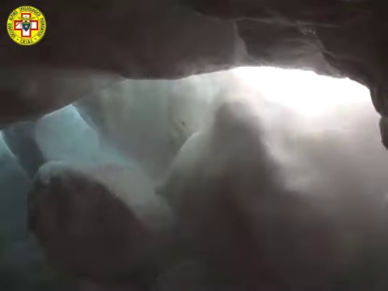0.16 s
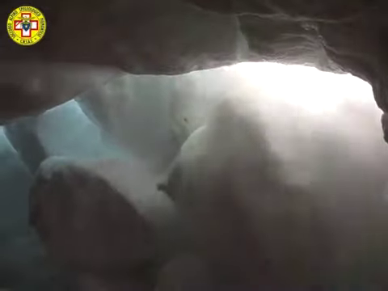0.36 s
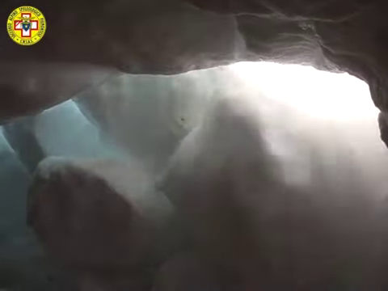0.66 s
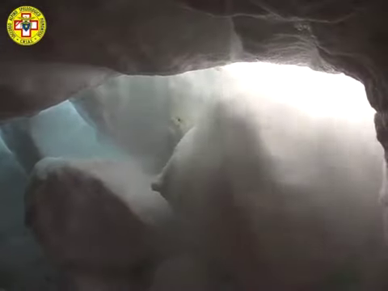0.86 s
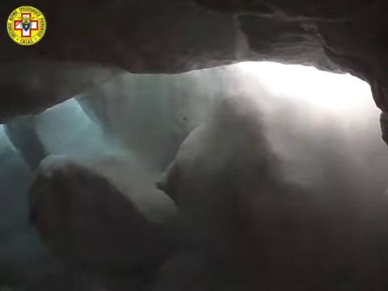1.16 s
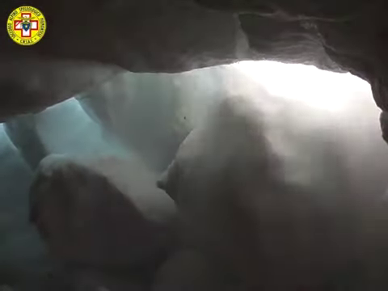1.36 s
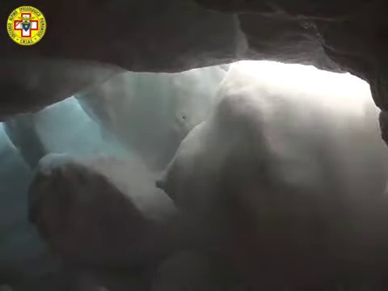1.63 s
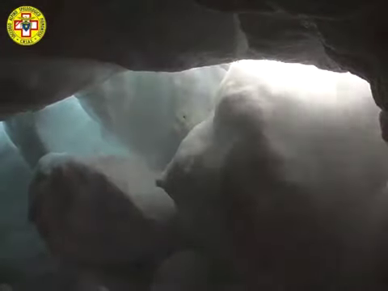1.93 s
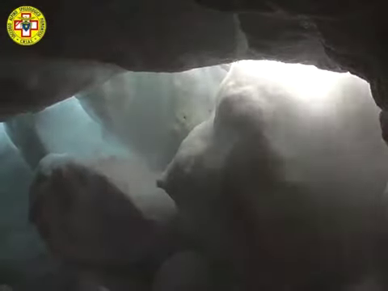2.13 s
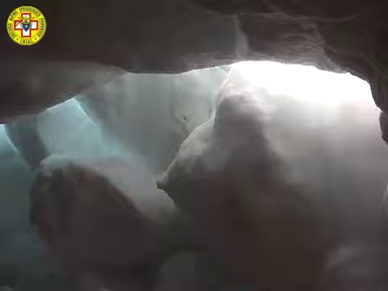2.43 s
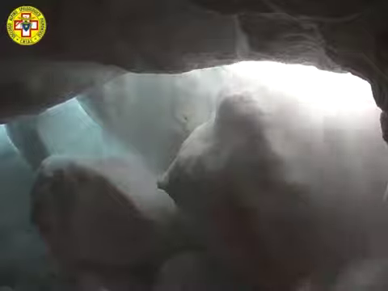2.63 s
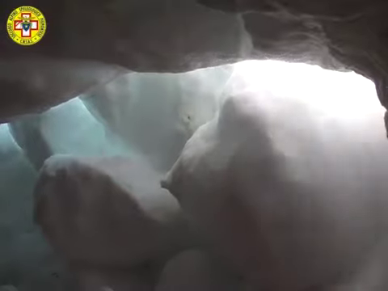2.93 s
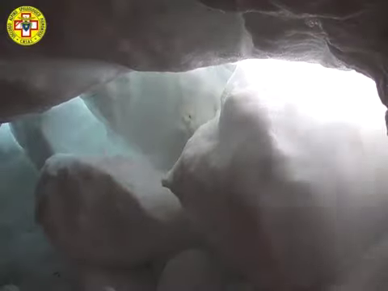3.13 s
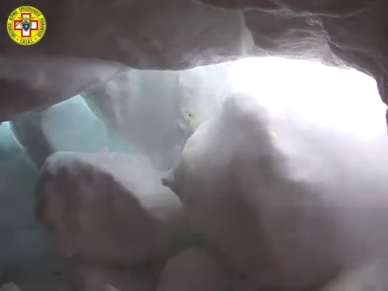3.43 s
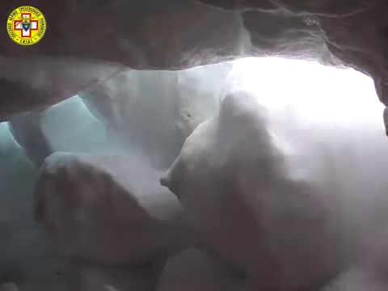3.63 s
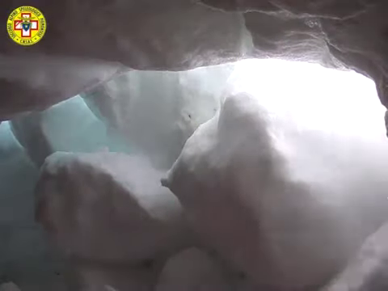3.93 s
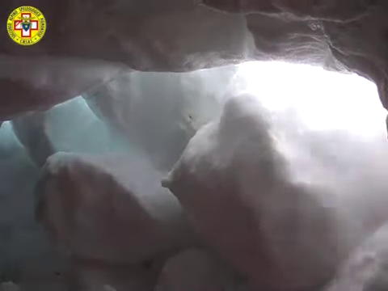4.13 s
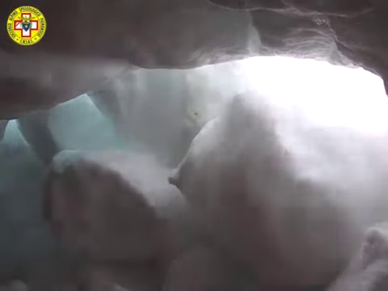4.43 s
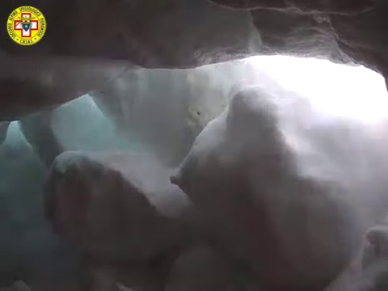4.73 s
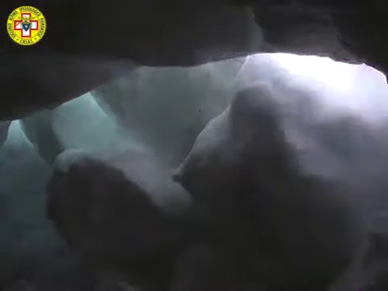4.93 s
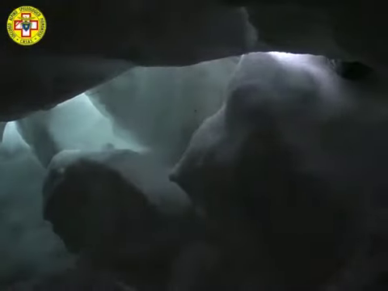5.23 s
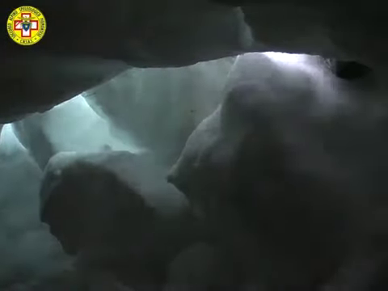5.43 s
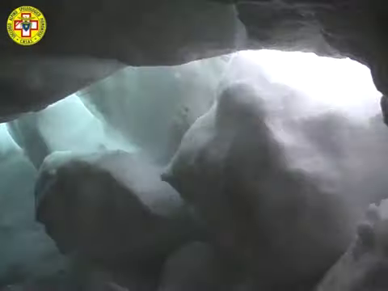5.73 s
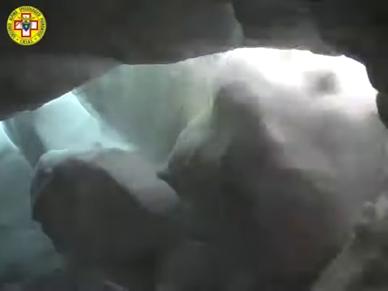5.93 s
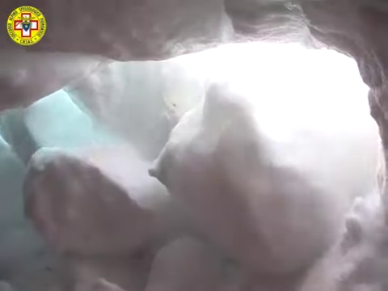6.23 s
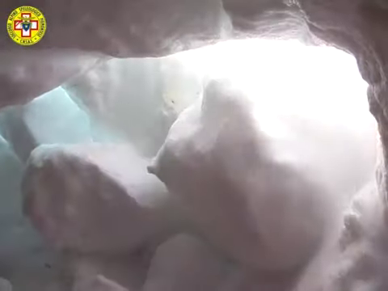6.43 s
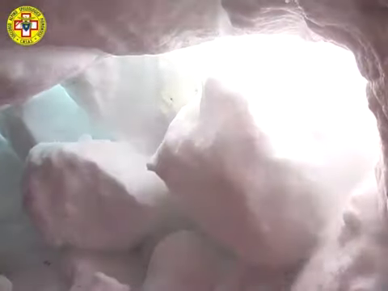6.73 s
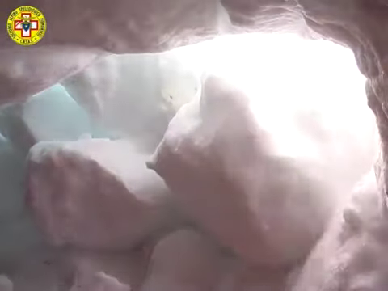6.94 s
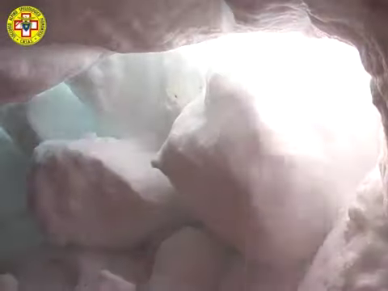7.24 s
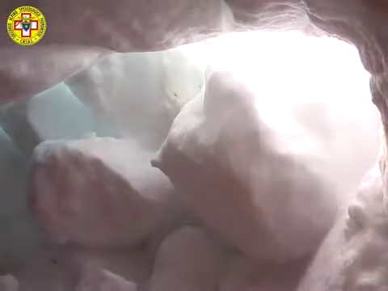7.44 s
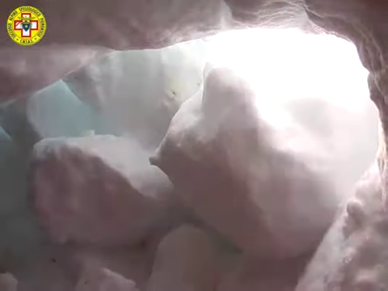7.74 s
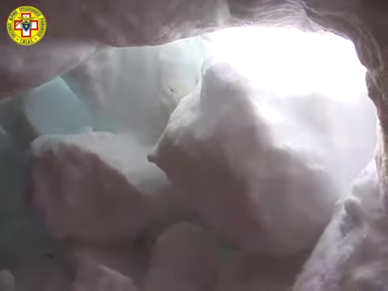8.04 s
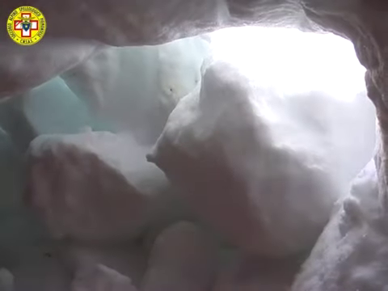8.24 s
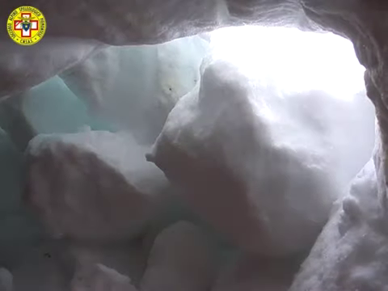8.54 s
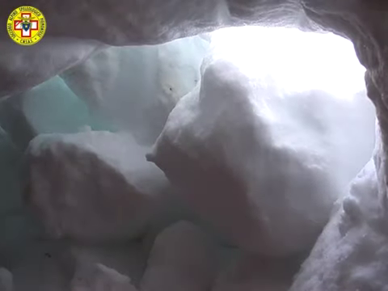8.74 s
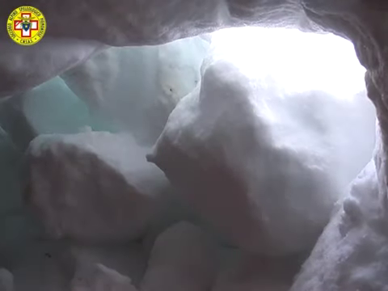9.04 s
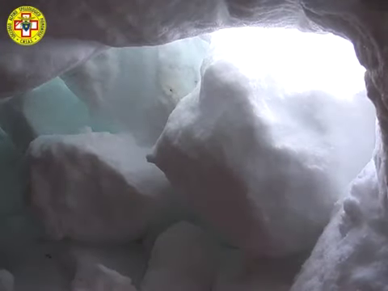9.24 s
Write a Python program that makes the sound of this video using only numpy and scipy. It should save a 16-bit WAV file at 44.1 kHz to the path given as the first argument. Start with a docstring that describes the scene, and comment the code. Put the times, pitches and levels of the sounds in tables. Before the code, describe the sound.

Heard close up inside a small snow hollow: a dog digs fast, paws rasping through crisp icy snow four or five times a second, thudding low on the roof while crumbs tick. After about three seconds six short, hoarse yelps come, each climbing from a grunt to a whine. The digging thins and fades until little but a faint quiet bed remains.

```python
"""A dog digs into a snow hole, heard from inside it.
At first its paws rasp through icy snow four or five times a second and thump the hollow; crumbs tick.
From about three seconds it gives six yelping barks, each climbing from a grunt to a whine that sags;
a few grainy bursts trail the barks. The digging grows fainter and dies away. Snow is filtered bursts
of noise, thumps are ringing modes, and the voice is a stack of gliding harmonics with hoarse breath."""
import sys
import numpy as np
from scipy import signal
from scipy.fft import rfft, irfft, next_fast_len
from scipy.io import wavfile
from scipy.ndimage import uniform_filter1d

SR = 44100
rng = np.random.default_rng(int(sys.argv[2]) if len(sys.argv) > 2 else 0)


def persist_wave(psi):
    """Save psi, clipped to +-1, as 16-bit WAV."""
    counts = np.round(np.clip(psi, -1, 1) * 32767).astype(np.int16)
    wavfile.write(sys.argv[1], SR, np.atleast_2d(counts).T)


N = 413216
TIME = np.arange(N) / SR

# All levels in the tables are relative: trims, filters and the room come after them.
# faint bed of the hollow: hz, level_db
QUIET_SPECTRUM = [(20, -7), (200, -5.5), (400, -5.5), (1000, -4.5), (4000, -17.5), (10000, -27.5),
                  (15500, -22)]
# likeness of left and right: hz, likeness (0-1)
STEREO_LIKENESS = [(60, 1), (250, 0.9), (700, 0.74), (1400, 0.31), (4000, 0.78), (7000, 1), (10000, 0.58),
                   (15000, 0.2)]
# weight shifting on the roof: time_s, level_db
WEIGHT = [(0, -61), (0.8, -55.5), (2.5, -58.5), (3.1, -51), (4.4, -53.5), (4.9, -65), (5.55, -58.5),
          (5.95, -53), (6.55, -49.5), (7.05, -59.5), (7.4, -70), (7.8, -85), (7.95, -61), (8.6, -64),
          (9.1, -77)]
# low rumble of the roof: hz, level_db
RUMBLE_SPECTRUM = [(20, -31.5), (55, -12), (115, 0.5), (160, -2.5), (220, -2), (320, -13.5), (550, -19),
                   (1200, -34.5), (4000, -66)]
# paws landing on the roof: start_s, level_db
THUMPS = [(0.002, -32.5), (0.182, -30), (0.216, -25.5), (0.376, -29.5), (0.526, -36.5), (0.569, -28.5),
          (1.046, -30.5), (1.264, -33), (1.844, -38.5), (2.414, -41.5), (2.66, -31.5), (2.812, -40),
          (2.869, -31), (3.048, -37), (3.214, -28.5), (3.674, -29.5), (3.884, -33.5), (4.314, -38),
          (4.686, -37.5), (5.838, -34.5), (6.571, -31.5), (6.612, -34.5), (7.907, -50), (8.033, -49.5),
          (8.307, -51), (8.507, -49.5)]
# modes of the roof and the air under it: hz, level_db, t60_s
ROOF_MODES = [(57, -26.5, .12), (122, 1.5, 0.12), (177, 4.5, 0.07), (203.6, -2, 0.07), (280.4, -15, 0.015)]
# crust snapping and crumbs landing: start_s, level_db
SNAPS = [(0.206, -30.5), (0.909, -37), (1.954, -33), (1.964, -45), (2.927, -34.5), (3.24, -35),
         (3.292, -34), (3.4527, -41), (3.505, -45.5), (3.562, -45.5), (3.67, -41.5), (4.294, -38.5),
         (4.854, -55), (4.946, -49.5), (5.106, -56), (6.3217, -33), (6.962, -49.5), (7.3093, -58.5),
         (7.37, -49), (7.4507, -56), (7.879, -61), (7.91, -57), (8.036, -66), (8.12, -73)]
# loose snow trickling under the bursts: time_s, level_db
TRICKLE = [(0, -53), (.8, -52), (1.4, -49), (2.8, -52.5), (3.6, -59.5), (4.4, -57.5), (4.78, -71.5),
           (5.0, -68), (5.62, -69.5), (5.98, -56), (6.55, -55), (6.66, -65), (7.25, -72), (7.38, -68),
           (7.7, -79), (7.92, -75.5), (8.25, -83.5), (9.35, -87)]
# grainy bursts: paw strokes, but the rows at 4.64, 4.708 and 6.515 are the noisy tails of barks;
# end_s (where a stroke lifts), length_s, rasp_db (bright part), crunch_db (dull part)
BURSTS = [(.188, 0.12, -41.5, -46.5), (.36, .12, -41, -46.5), (.588, .12, -37, -45.5),
          (.812, 0.17, -40, -52), (1.022, 0.17, -38.5, -53), (1.268, 0.18, -37.5, -45),
          (1.5, 0.19, -42, -51.5), (1.705, 0.16, -43, -58), (1.87, 0.092, -43, -50),
          (1.925, 0.028, -43, -63), (2.17, 0.17, -42, -53.5), (2.295, .075, -39.5, -46),
          (2.388, 0.081, -39.5, -50), (2.495, 0.068, -42.5, -57), (2.662, .13, -40, -46.5),
          (2.865, 0.15, -38.5, -43.5), (3.11, 0.14, -43.5, -52), (3.218, 0.057, -37, -44),
          (3.36, 0.062, -42, -40.5), (3.838, 0.093, -46.5, -51), (4.03, 0.18, -56, -57),
          (4.255, 0.13, -56.5, -55.5), (4.469, .12, -53, -59), (4.64, .06, -55.5, -47.5),
          (4.708, .025, -57, -43), (5.89, 0.038, -64.5, -47.5), (6.15, .1, -52.5, -51.5),
          (6.275, 0.095, -54, -51), (6.515, 0.037, -49, -38.5), (6.785, 0.091, -49.5, -55.5),
          (7.07, 0.083, -61.5, -57), (8.15, .2, -79, -71)]
# bright scrape of the crust: hz, level_db
RASP_SPECTRUM = [(500, -28), (1500, -9), (3000, -5.5), (4700, -3.5), (6500, -2.5), (9300, 2), (11000, -1.5),
                 (13000, -5.5), (15500, -14.5)]
# duller crush of packed snow: hz, level_db
CRUNCH_SPECTRUM = [(150, -5), (350, -4.5), (580, -3), (760, 8), (1050, -4), (1300, -2), (2450, -2.5),
                   (2900, -8), (15000, -45.5)]
# resonances of the hole: hz, width_hz, gain_db
HOLE_PEAKS = [(755, 250, -1.5), (1044, 120, 9), (1560, 470, 3.5), (4060, 300, 4), (6360, 130, 3.5),
              (7680, 210, 2)]
# colour with the dog at the opening: hz, width_hz, gain_db
NEAR_PEAKS = [(3110, 360, 8.7)]
# colour with the dog stepped back: hz, width_hz, gain_db
BACK_PEAKS = [(3400, 1500, 0), (5000, 460, -2.5), (5630, 360, 5.5)]
# pitches that cancel in the hole, so a gliding voice dips as it passes: hz, width_hz, gain_db
VOICE_NOTCHES = [(303, 72, -9.5), (609, 40, -13)]
# barks: start_s (the push), length_s, attack_s, glide_s, top_hz, sag (share of pitch), grunt_db, push_db,
# whine_db, push_rough (0-1), whine_rough (0-1), chest_db, bright_db (open mouth), falsetto (0-1)
BARKS = [(3.293, 0.12, 0.06, .04, 370, 0.63, -34, -25, -29, .62, 0.74, 0, -6, 0),
         (3.912, .132, 0.054, .036, 600.7, 0.39, -34.5, -18.5, -23.5, .75, 0.25, -7, -3.5, 0.94),
         (4.541, 0.14, 0.034, .034, 723.4, 0.028, -30.5, -20, -26.5, .75, 0.29, -5, 1, 0),
         (5.699, 0.12, .008, 0.032, 693.7, 0.18, -19.5, -16, -25.5, .55, 0.29, -1, -2, 0.13),
         (6.361, 0.1, 0.033, .028, 411.4, 0.048, -31.5, -23.5, -26, .35, 0.6, -3, 0.5, 0.73),
         (7.105, 0.11, 0.04, .037, 716.5, .2, -33.5, -20.5, -24, .1, .15, 1, -2, 0.16)]
# the dog's throat and mouth: hz, level_db
THROAT_SPECTRUM = [(60, -18), (130, -10.5), (240, 3), (330, -3.5), (500, 1), (720, 8), (900, -5.5),
                   (1200, 2.5), (1550, -10.5), (1950, -5.5), (2400, -5.5), (2850, -42), (9000, -35),
                   (15500, -51.5)]
# thin whistles through the nose: start_s, pitch_hz, level_db
WHISTLES = [(4.855, 13400, -58), (7.125, 13500, -52.5)]

EDGE_HZ = 15750  # top of the whole sound
STEP_BACK_S = 3  # the dog works at the opening until then
# a burst bites in, swells and lets go
BITE_S, SWELL_DB, LET_GO_S = 0.017, 7.5, 0.014
# every bark opens with a low grunt and ends with a sag in pitch and a quick release
GRUNT_S, GRUNT_START_HZ, GRUNT_HZ, GRUNT_START_DB = 0.025, 100, 129.4, -39
SAG_S, RELEASE_S, RELEASE_DB = 0.028, 0.018, 21.5
HOARSE_S = 0.03  # pace at which roughness comes and goes around the push
FALSETTO_S = 0.049  # the voice can crack this long before its end


def amp(db):
    """Decibels to gain."""
    return 10 ** (np.asarray(db) / 20)


def evened(x):
    """Scales to rms 1."""
    return x / np.sqrt(np.mean(x ** 2) + 1e-20)


def read_spectrum(points, hz):
    """Reads a spectrum table at any frequencies, along a log frequency axis."""
    f, value = np.transpose(points)
    return np.interp(np.log(hz + 1), np.log(f + 1), value)


def follow(points, t):
    """Reads a two-column curve at times t."""
    s, value = np.transpose(points)
    return np.interp(t, s, value)


def add(mix, s, sound):
    """Mixes a sound in at time s."""
    part = mix[max(round(s * SR), 0):][:len(sound)]
    part += sound[:len(part)]


def colour(x, points, peaks=()):
    """Filters by a spectrum table with resonance peaks or notches on top."""
    size = next_fast_len(x.shape[-1] + 2048)  # room for the filter to ring
    hz = np.fft.rfftfreq(size, 1 / SR)
    db = read_spectrum(points, hz)
    for f, width, height in peaks:
        db = db + height / (1 + (2 * (hz - f) / width) ** 2)
    return irfft(rfft(x, size) * amp(db), size)[..., :x.shape[-1]]


def wander(size, hz):
    """Smooth chance of rms 1, with a soft speed limit around hz."""
    full = next_fast_len(size)
    f = np.fft.rfftfreq(full, 1 / SR)
    slow = rfft(rng.standard_normal(full)) * np.exp(-(f / hz) ** 2)
    return evened(irfft(slow, full)[:size])


def spread(pair):
    """Turns two unrelated sounds into left and right, their likeness set per frequency."""
    size = next_fast_len(N)
    same = np.clip(read_spectrum(STEREO_LIKENESS, np.fft.rfftfreq(size, 1 / SR)), 0, 1)
    mid, side = rfft(pair, size) * np.sqrt([(1 + same) / 2, (1 - same) / 2])
    return irfft([mid + side, mid - side], size)[:, :N]


def wide_noise():
    """White noise spread over left and right."""
    return spread(rng.standard_normal((2, N)))


def quiet():
    """The steady faint bed under everything: shaped noise."""
    return amp(-75) * evened(colour(wide_noise(), QUIET_SPECTRUM))


def echoes(x, delay_s, t60):
    """Scattered reflections that start after a delay and die away, different in each ear."""
    t = np.arange(SR // 2) / SR
    fade = (t > delay_s) * amp(-60 * np.maximum(t - delay_s, 0) / t60)
    taps = rng.standard_normal((2, len(t))) * fade
    taps /= np.linalg.norm(taps, axis=1, keepdims=True)
    return signal.fftconvolve(x[None], taps, axes=1)[:, :N]


def slope_echo(voice):
    """The slope outside throws the barks back faintly, thinned in the bass."""
    thinned = colour(voice, [(200, -16.5), (700, -15.5), (1100, -1), (2400, -1.5)])
    return amp(-15.5) * spread(echoes(thinned, delay_s=0.05, t60=0.062))


def soft_walls(near):
    """The soft walls of the hole answer almost at once."""
    return amp(-14) * echoes(near, delay_s=0.0012, t60=0.17)


def close_wall(x, cancel_hz=1520, width_hz=330, depth=0.46, lean_db=0.65):
    """A close wall thins one band on the left only; the whole leans slightly left."""
    band = signal.lfilter(*signal.iirpeak(cancel_hz, cancel_hz / width_hz, SR), x)
    return np.array([amp(lean_db) * (x - depth * band), amp(-lean_db) * x])


def rumble(level_db=-2, lumps_db=3):
    """The snow roof gives in small lurches under the dog's weight: low noise of uneven level."""
    noise = evened(colour(wide_noise(), RUMBLE_SPECTRUM))
    return noise * amp(follow(WEIGHT, TIME) + level_db + lumps_db * wander(N, hz=25))


def snaps(decay_s=0.0079, spray_s=0.014, spray_db=-17, level_db=-4):
    """Each snap is a sharp crack of noise with a fainter, longer spray of crumbs."""
    t = np.arange(SR // 8) / SR
    burst = np.exp(-t / decay_s) + amp(spray_db) * np.exp(-t / spray_s)
    envelope = np.zeros(N)
    for s, db in SNAPS:
        add(envelope, s, amp(db) * burst)
    return amp(level_db) * envelope * evened(colour(wide_noise(), RASP_SPECTRUM, HOLE_PEAKS))


def roof_ring(t):
    """The low modes of the roof, each detuned slightly by chance and dying at its own rate."""
    ring = np.zeros(len(t))
    for hz, mode_db, t60 in ROOF_MODES:
        detuned_hz = hz * (1 + rng.normal() / 50)
        ring += amp(mode_db - 60 * t / t60) * np.cos(2 * np.pi * detuned_hz * t)
    return ring


def thumps(push_s=0.006, crush_s=0.009, crush_db=-15, level_db=-1):
    """A paw gives the roof an uneven push that rings its low modes and crushes a little snow."""
    t, out = np.arange(SR // 4) / SR, np.zeros(N)
    for s, db in THUMPS:
        push = t * np.exp(-t / push_s) * (0.5 + wander(len(t), hz=418.5))
        thud = signal.fftconvolve(push, roof_ring(t))[:len(t)]
        crush = evened(colour(rng.standard_normal(len(t)), CRUNCH_SPECTRUM)) * np.exp(-t / crush_s)
        add(out, s, amp(db + level_db) * (thud / abs(thud).max() + amp(crush_db) * crush))
    return out


def grains(per_s, scatter_db, ring_s):
    """Ice grains breaking: tiny bursts of noise, a few larger than the rest."""
    breaks = rng.random(N) < per_s / SR
    sizes = amp(scatter_db * np.minimum(rng.exponential(1, N), 5)) * breaks
    # dividing by the rate keeps the level steady while the density changes
    power = signal.lfilter([1], [1, -np.exp(-1 / (ring_s * SR))], sizes ** 2 / per_s)
    return evened(np.sqrt(power) * rng.standard_normal((2, N)))


def patchy(x, depth_db):
    """Lets the colour shift by chance, as it does when grains break in ever new places."""
    z = signal.stft(x, nperseg=256, noverlap=192)[2]
    field = uniform_filter1d(rng.standard_normal(z.shape[1:]), size=18, axis=0)  # across frequency
    field = evened(uniform_filter1d(field, size=22, axis=1))  # across time
    return signal.istft(z * amp(depth_db * field), nperseg=256, noverlap=192)[1][:, :N]


def burst_power():
    """Power of rasp and crunch: each burst swells and lets go over the trickle of loose snow."""
    trickle_db = follow(TRICKLE, TIME)
    power = amp([trickle_db, trickle_db - 3]) ** 2  # rasp, crunch
    for end_s, length, *levels_db in BURSTS:
        t = np.arange(-length - 4 * BITE_S, 8 * LET_GO_S, 1 / SR)  # 0 is where it lets go
        swell = amp(SWELL_DB * np.minimum(t, 0) / length)
        edges = np.exp(np.minimum(t + length, 0) / BITE_S - np.maximum(t, 0) / LET_GO_S)
        for layer, db in zip(power, levels_db):
            add(layer, end_s + t[0], (amp(db) * swell * edges) ** 2)
    return power


def grainy_snow():
    """Clumps of breaking grains: dense in a hard stroke, sparse in the trickle; also the barks' tails."""
    rasp_db, crunch_db = 10 * np.log10(burst_power())
    per_s = 600 + 10000 * amp(rasp_db + 44.5)  # louder bursts hold more grains
    clumps = wander(N, hz=62)
    back = np.clip((TIME - STEP_BACK_S) * 20, 0, 1)  # 50 ms crossfade
    out = np.zeros((2, N))
    for spectrum, db in (RASP_SPECTRUM, rasp_db), (CRUNCH_SPECTRUM, crunch_db):
        ice = patchy(spread(grains(per_s, scatter_db=2, ring_s=0.0014)), depth_db=3)
        at_opening = evened(colour(ice, spectrum, HOLE_PEAKS + NEAR_PEAKS))
        stepped_back = evened(colour(ice, spectrum, HOLE_PEAKS + BACK_PEAKS))
        out += ((1 - back) * at_opening + back * stepped_back) * amp(db + 0.6 * clumps)
    return out


def whistle(hz, db):
    """A 16 ms nasal whistle: a sine of slightly unsteady pitch that swells and fades."""
    size = int(0.016 * SR)
    turns = np.cumsum(hz * (1 + 0.012 * wander(size, hz=151.5))) / SR
    return amp(db) * np.hanning(size) * 2 * np.sin(2 * np.pi * turns)


def gesture(length, attack_s, glide_s, top_hz, sag, grunt_db, push_db, whine_db, push_rough, whine_rough):
    """One bark's effort, pitch and roughness: a grunt, a push that glides up, a whine that sags."""
    t = np.arange(-GRUNT_S, length, 1 / SR)  # 0 is the start of the push
    effort_db = np.interp(t, [-GRUNT_S, 0, attack_s, length - RELEASE_S],
                          [GRUNT_START_DB, grunt_db, push_db, whine_db])
    effort_db -= RELEASE_DB * np.clip(1 + (t - length) / RELEASE_S, 0, 1) ** 2
    pitch = np.interp(t, [-GRUNT_S, 0], [GRUNT_START_HZ, GRUNT_HZ])
    pitch += (top_hz - GRUNT_HZ) * (1 - np.exp(-np.maximum(t, 0) / glide_s))
    pitch *= 1 - sag * np.sin(np.pi / 2 * np.clip(1 + (t - length) / SAG_S, 0, 1)) ** 2
    rough = np.interp(t - attack_s, [-HOARSE_S, 0, HOARSE_S, 2 * HOARSE_S],
                      [0.15, push_rough, (push_rough + whine_rough) / 2, whine_rough])
    return t, effort_db, pitch, np.clip(rough, 0.1, 1)  # never quite pure


def vocal_folds(turns, pitch, rough, crack):
    """Harmonics of the beating folds: softer when slack, blurred with height, fluttering when rough."""
    blur_hz, flutter_hz, flutter, blur, tight_hz = 302, 195, 0.49, 0.15, 450
    k = np.arange(1, 25)[:, None]  # harmonic numbers
    slope = 0.35 + 0.94 * np.maximum(np.log2(tight_hz / pitch), 0)  # slack folds close softly
    strength = amp(read_spectrum(THROAT_SPECTRUM, k * pitch)) * k ** -slope * (k * pitch < EDGE_HZ)
    strength *= 1 - crack * (k % 2)  # a cracked voice jumps an octave: its odd harmonics fade
    # the higher a harmonic lies, the more its timing blurs
    lag = np.array([wander(pitch.size, blur_hz) for _ in k]) * blur * (k - 1) * pitch / tight_hz
    lag += rng.standard_normal(k.shape)
    # loose tissue flaps at its own low rate and puts side lines between the harmonics
    flap_rate_hz = flutter_hz * (1 + 0.25 * wander(pitch.size, hz=147))
    flap = np.sin(2 * np.pi * np.cumsum(flap_rate_hz) / SR)
    partials = np.cos(2 * np.pi * k * turns + lag) * (1 + flutter * rough * flap * (2 - 1 / k))
    return (strength * partials).sum(0) / np.sqrt((strength ** 2).sum(0) / 2)


def hoarse_breath(turns, effort_db):
    """Noise puffed once per beat of the folds: throaty, plus a hiss on the hardest pushes."""
    puffs = (0.36 + np.exp(-(turns % 1) / 0.21)) * rng.standard_normal(len(turns))
    throaty = colour(puffs, THROAT_SPECTRUM)
    hoarse = evened(colour(throaty, [(300, -16), (700, 0.5), (3000, -1)]))
    spit = evened(colour(puffs, [(4000, 4.5), (15000, -21.5)]))
    return amp(-4) * hoarse + spit * amp(2.4 * (effort_db + 8.5))


def bark(start, shape, chest_db, bright_db, falsetto):
    """Vocal folds tighten from a dull grunt to a whine; in between they beat unevenly and turn hoarse."""
    t, effort_db, pitch, rough = gesture(*shape)
    crack = falsetto * np.clip((t - t[-1] + FALSETTO_S) / 0.012, 0, 1)
    turns = np.cumsum(pitch * (1 + 0.07 * rough * wander(len(t), hz=402))) / SR
    clear = np.sqrt(1 - rough ** 2) * vocal_folds(turns, pitch, rough, crack)
    voice = clear + rough * hoarse_breath(turns, effort_db)
    voice = colour(voice, [(200, 0.0019), (350, chest_db), (530, chest_db), (660, 0.00055),
                           (850, 0.0035), (1100, bright_db)])
    return start + t[0], amp(effort_db) * voice * signal.windows.tukey(len(t), 0.04)


def dog():
    """The barks and thin nasal whistles, coloured by the hole from the stepped-back place."""
    out = np.zeros(N)
    for start, *shape, chest_db, bright_db, falsetto in BARKS:
        add(out, *bark(start, shape, chest_db, bright_db, falsetto))
    for s, hz, db in WHISTLES:
        add(out, s, whistle(hz, db))
    return colour(out, [(40, -23), (100, 1)], BACK_PEAKS + VOICE_NOTCHES)


def scene():
    """Layers the bed, the snow and the dog; walls and slope answer the voice, walls also the thumps."""
    voice = dog()
    near = voice + thumps()
    room = soft_walls(near) + slope_echo(voice)
    snow = rumble() + snaps() + grainy_snow()
    return quiet() + room + snow + close_wall(near)


def record(dry):
    """Band limit: a steep low-pass at EDGE_HZ."""
    low_pass = signal.firwin(511, EDGE_HZ, window=("kaiser", 9), fs=SR)
    return signal.oaconvolve(dry, low_pass[None], "same")


dry = scene()
out = record(dry)
persist_wave(out)
```